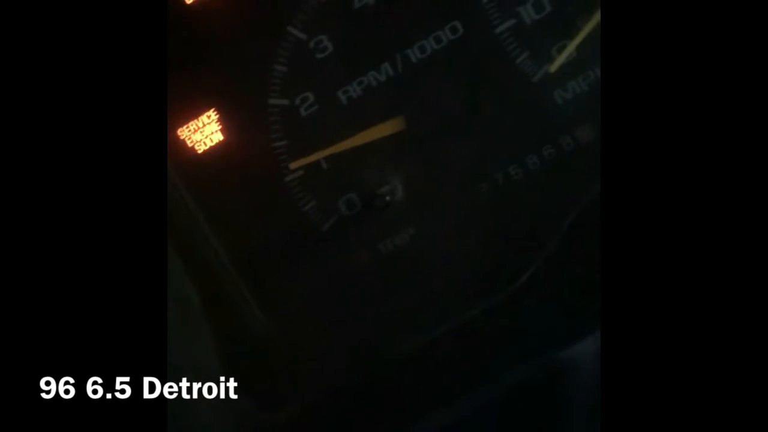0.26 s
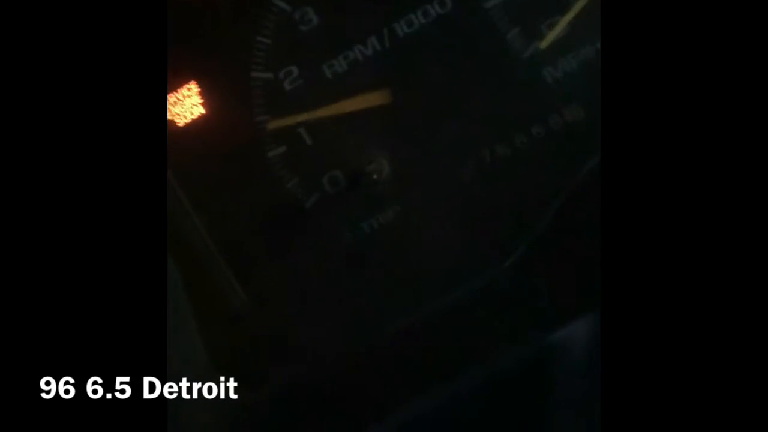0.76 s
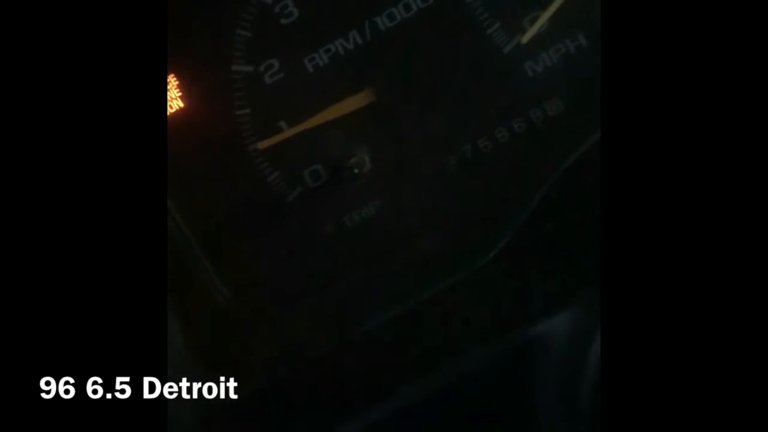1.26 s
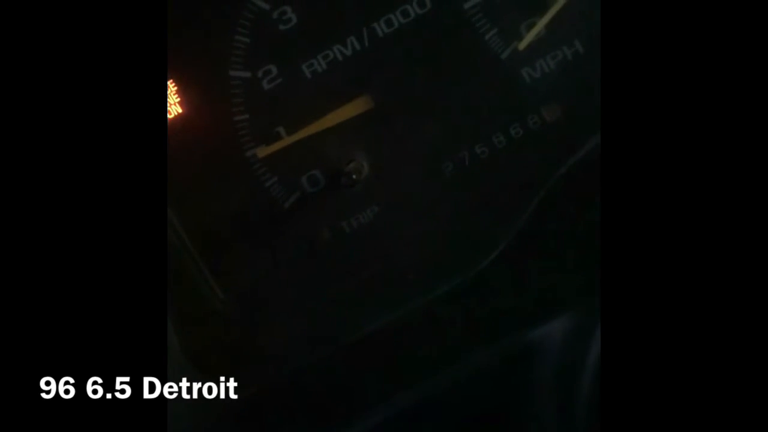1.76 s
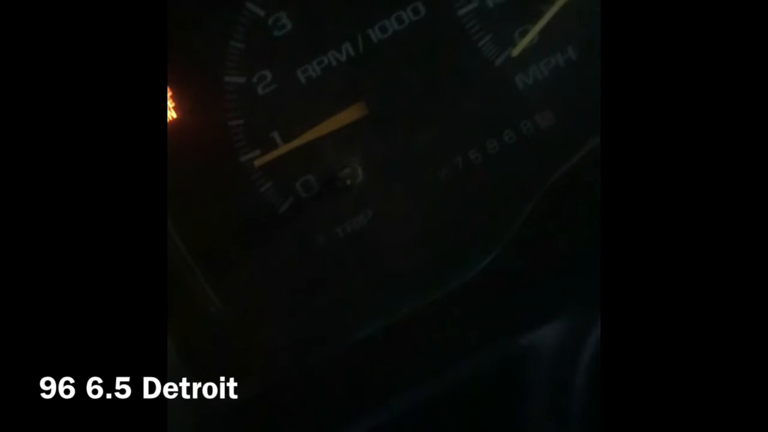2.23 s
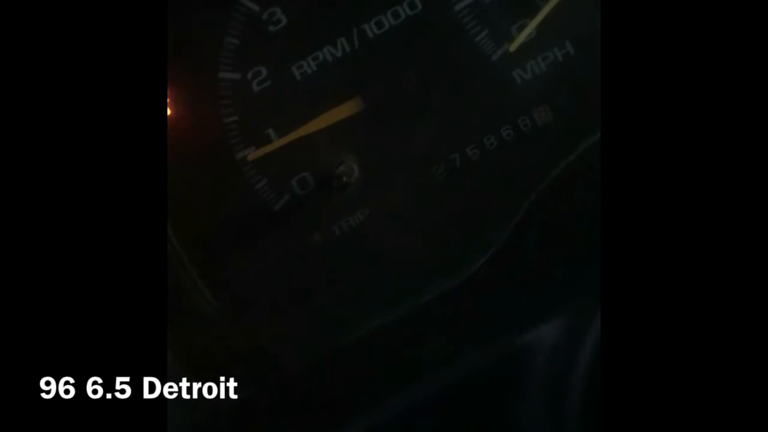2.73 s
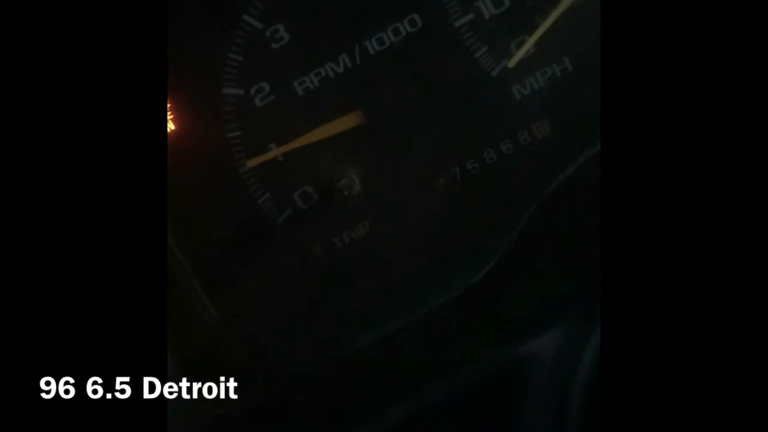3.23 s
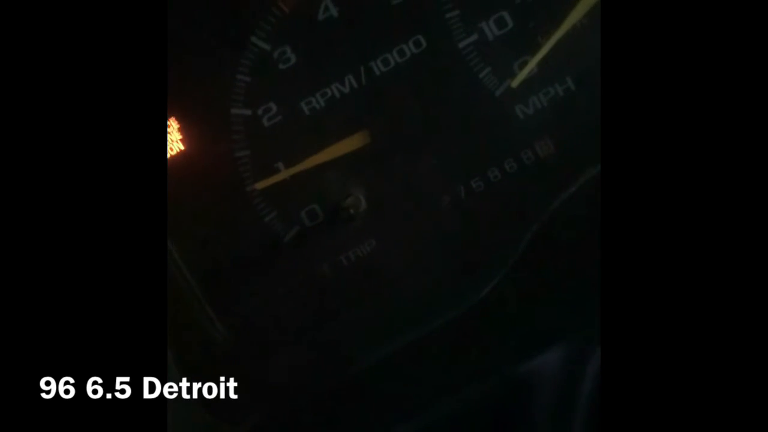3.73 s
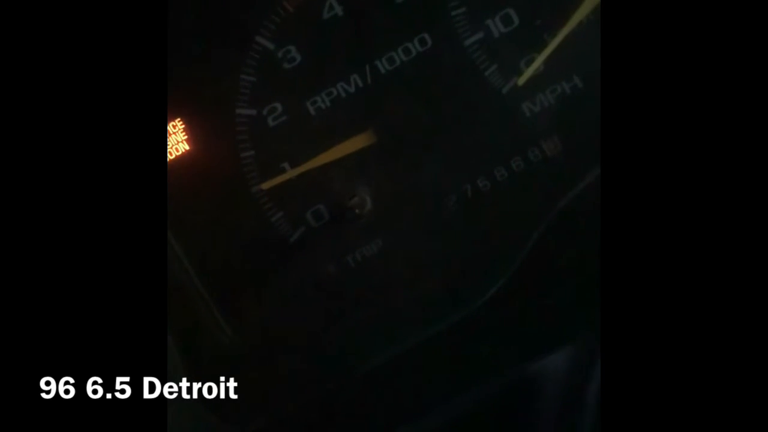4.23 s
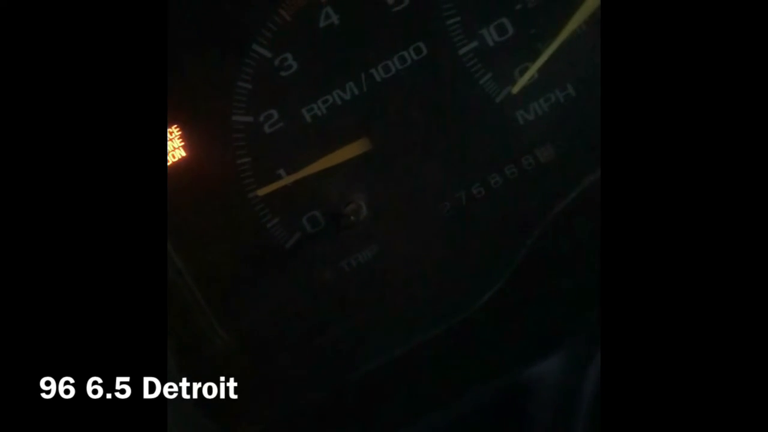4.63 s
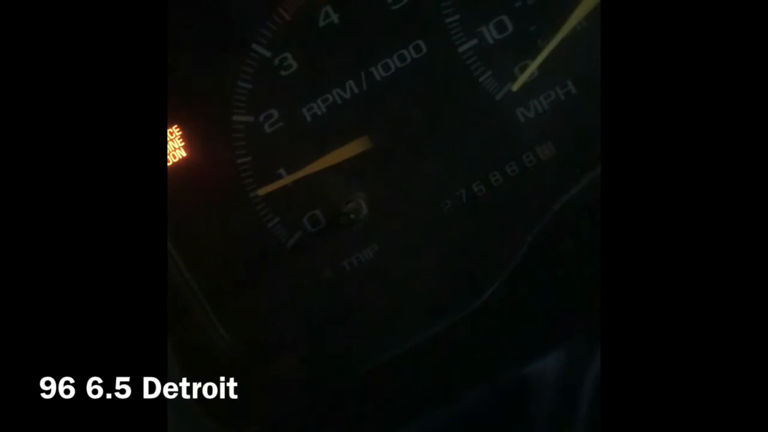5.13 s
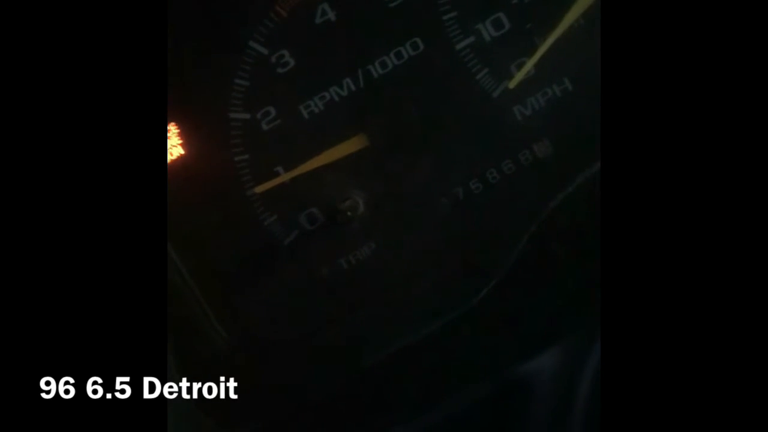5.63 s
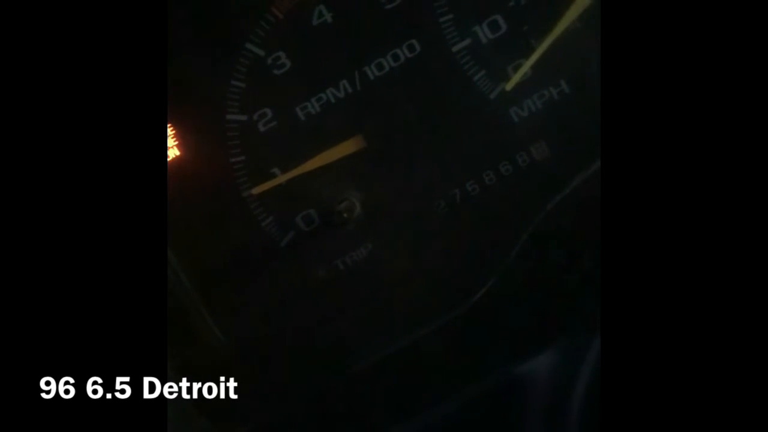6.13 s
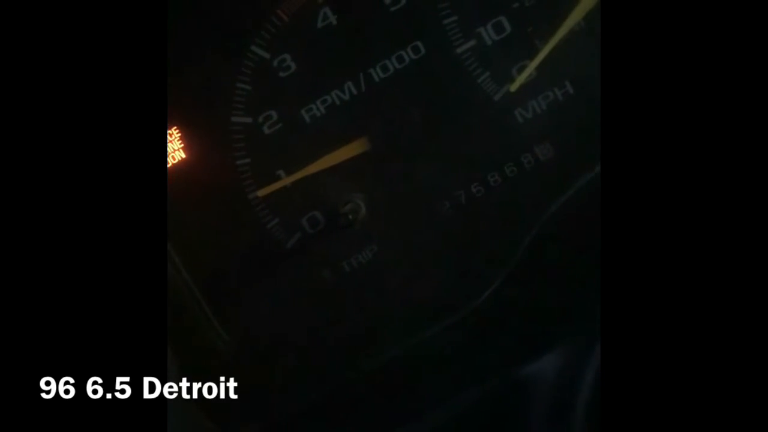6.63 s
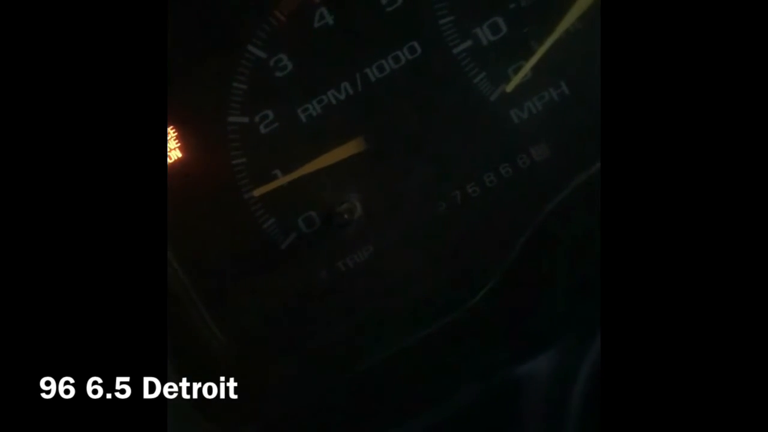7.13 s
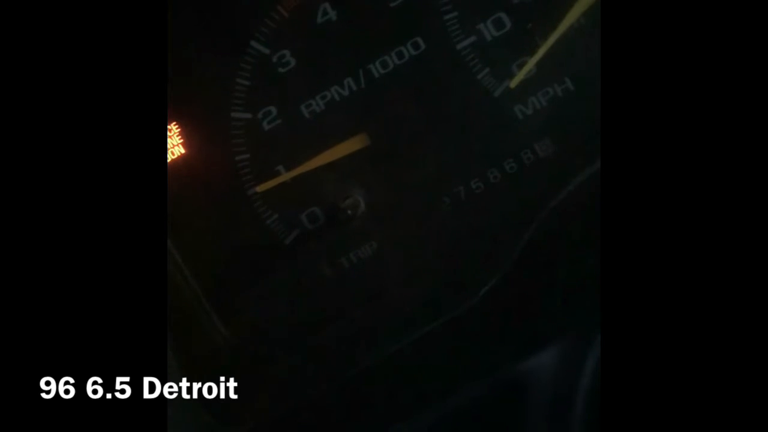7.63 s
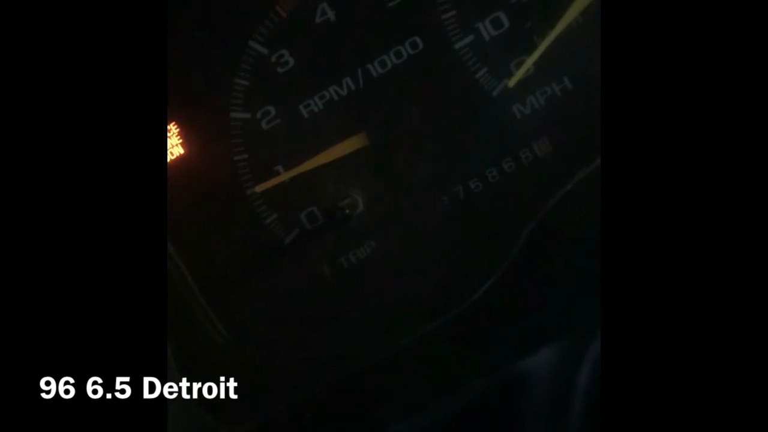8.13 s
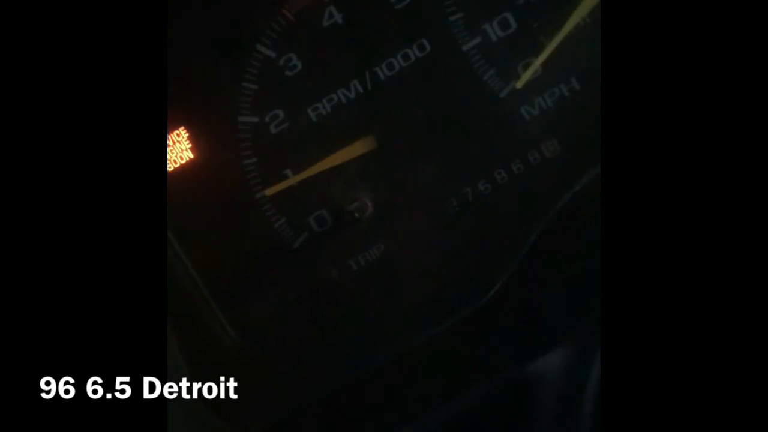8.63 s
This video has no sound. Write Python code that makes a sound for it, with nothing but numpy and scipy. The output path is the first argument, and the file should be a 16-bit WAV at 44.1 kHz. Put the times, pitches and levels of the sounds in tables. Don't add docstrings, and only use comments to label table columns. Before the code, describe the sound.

A big diesel shudders just after a cold start, with booming lurches and sharp metal slaps crowding the first second. The revs sag, climb quickly, drop back and hold as a lumpy, regular idle of low thumps, dry block knocks and light pump ticks. Heard from the enclosed cab on a small, slightly hissy microphone, dull on top and lacking deep bass.

```python
import sys
import numpy as np
from scipy import signal
from scipy.fft import rfft, irfft, next_fast_len
from scipy.io import wavfile
from scipy.ndimage import uniform_filter1d

SR = 44100
rng = np.random.default_rng(int(sys.argv[2]) if len(sys.argv) > 2 else 0)


def unload_audio(sound):
    columns = np.transpose(np.atleast_2d(sound))
    steps = np.round(np.clip(columns, -1, 1) * 32767)
    wavfile.write(sys.argv[1], SR, steps.astype(np.int16))


def gain_from_db(level_db):
    decades = np.asarray(level_db, float) / 20
    return 10 ** decades


N = 391166
SIZE = next_fast_len(N + SR)
HZ = np.arange(SIZE // 2 + 1) * SR / SIZE + 1e-3
TIME = np.arange(N) / SR

# from t/s, to t/s, level/dB
HISS_STEPS = [
    (0, 1.355, -67),
    (2.82, 4.555, -67),
    (8.862, 8.9, -71),
]
# f/Hz, level/dB per Hz
HISS_COLOUR = [(4000, -2), (8000, -2), (10000, -2), (10500, -5), (11000, -1), (15700, 1)]
QUIET_HISS_DB = -75.5

# from t/s, to t/s, f/Hz, width/Hz, level/dB
BELT_SLIP = (.088, .25, 5300, 700, -61)
# time/share of cycle, f/Hz, level/dB re sharp edge, scatter/dB, length/s
PUMP_RINGS = [
    (.745, 2360, -13, 2.2, .016),
    (.245, 2370, -17.5, 3.5, .016),
    (.1, 4450, -32, 4.5, .09),
]
TICK_SHARPNESS = 18

# t/s, peak level/dB, sizzle level/dB, air level/dB, body level/dB
SLAPS = [(0.098, -23, -34, -48, -9.5), (0.252, -11.5, -30, -28.5, 5.5), (0.276, -16.5, -27, -20.5, 7),
         (0.292, -16, -22.5, -25.5, 6.5), (0.308, -18, -20, -22.5, 8.5), (0.324, -14, -25, -21, 8.5),
         (0.575, -26.5, -19.5, -31.5, -1), (0.661, -9, -37, -46, -12), (0.7022, -14.5, -23, -48, -16),
         (0.915, -22, -33, -37, -24), (1.035, -19.5, -42, -39, -13.5), (1.093, -8.5, -30, -31, -21),
         (1.216, -39.5, -34, -41, 5)]
# f/Hz, width/Hz, level/dB
METAL_RING = [(3120, 600, 14), (2780, 130, 7.5), (3620, 350, 1)]
CLATTER_T60_S = 0.045
# centre t/s, f/Hz, peak level/dB, length/s
SHUDDERS = [(0.234, 57.7, -1, 0.045), (0.85, 62, -13, 0.16), (0.88, 182, -17, 0.096),
            (0.959, 170, -18.5, 0.15), (3.2, 93, -9, 0.07), (3.2, 225, -29, 0.58), (2.27, 130, -25.5, 0.6),
            (1.1, 110, -25, 0.97)]

# t/s, turns per minute
SPEED = [(0.0, 906.8), (0.9, 914.4), (1.14, 825.7), (1.4, 922.8), (1.75, 862.5), (1.95, 797.0),
         (2.4, 804.4), (2.7, 926.1), (2.95, 1007.2), (3.2, 1096.3), (3.4, 1028.5), (3.55, 936.5),
         (3.95, 963.8), (5.8, 959.6), (6.2, 955.3), (8.87, 951.8)]
START_CYCLE = 1.39
STEADY_CYCLE = 5533
HUNT_HZ, HUNT_WIDTH_HZ, HUNT_CYCLES, HUNT_DB = 2.8, 1.3, .006, .9
# t/s, level/dB re warm idle, depth of the cylinder pattern
FUEL = [(0, 3, 0.25), (.1, 5.5, 0.43), (.32, -1, 2.3), (.38, -3, .5), (.47, -2.5, 0.45), (.52, 6, 0.21),
        (.85, 4.5, 0.52), (.95, -7, 0.35), (1.08, -7.5, 1.2), (1.12, -2.5, 1), (1.2, -2.5, 2),
        (1.24, 2, 1.3), (1.5, -1.5, 1.5), (1.9, -3, 1.1), (2.9, 2.5, 1.4), (3.6, 0, 0.88), (4.2, 0.5, 1.3),
        (8.87, -0.5, 1.5)]
IDLE_DB = {"thump": -19.5, "growl": -32.5, "knock": -29.5, "edge": -42.5}
FUEL_SHARE = {"thump": 0.05, "growl": 0.68, "knock": 1.0, "edge": 1.3}
# t/s, level/dB over its usual knock
HARD_STROKES = [(.67, 4), (1.11, 12), (1.26, 5.5), (1.38, 4.5), (1.51, 1), (1.67, 5), (1.8, 5.5),
                (1.95, 3.5), (2.09, 3.5), (2.25, 3.5), (2.4, 3), (2.55, 5.5), (2.93, 2), (3.27, 3),
                (3.75, 5), (4.13, 4.5), (4.25, 1.5), (4.63, 1.5), (5.0, 5.5), (5.62, 1.5), (6.62, 0),
                (7.12, 4.5), (7.76, 0.5), (8.51, 1.5)]
HARD_SHARE = {"thump": 0.06, "growl": 0.6, "knock": 0.63, "edge": 1.39}
HARD_S = 0.025

# t/s, unevenness of the firing/0-1, scatter between firings/dB
COLD = [(0, .7, 3), (.7, .7, 3), (.8, .4, 2), (1, .7, 3), (1.5, .6, 2), (1.8, .12, 1.3), (2.4, .12, 1.3),
        (2.7, 1, 2), (3.7, 1, 1), (4, 1, .55), (8.87, 1, .5)]
# arrival/share of cycle, level/dB
THUMPS = [(.086, 2.8), (.14, .3), (.262, -4.3), (.383, -7.7), (.529, .1), (.782, 1.6), (.837, 4.9),
          (.906, 1.1)]
# f/Hz, width/Hz, level/dB, sign
CAB_MODES = [(71, 44, -23.2, 1), (82, 23, -21, -1), (124, 12, -34.9, -1), (149, 7, -37.8, -1),
             (176, 7, -43.3, -1), (202, 30, -44.9, -1)]
# f/Hz, level/dB per Hz
RUMBLE = [(25, -30.5), (40, -9.5), (55, -13), (100, -3), (140, 3.5), (200, -0.5), (250, -13.5), (400, -66)]
# t/s, thump level/dB over idle, half length/s
LURCHES = [(0, 3, 0.03), (0.2, 7.5, 0.073), (0.422, -3.5, 0.066), (0.504, 4.5, 0.056), (0.64, -6, 0.017),
           (0.679, 6.5, 0.011), (0.809, 13, 0.039), (0.88, 6, 0.045), (1.026, -2.5, .08), (2.892, 3, 0.087),
           (3.102, -2, 0.12)]

# time/share of cycle, growl level/dB, knock level/dB
CYLINDERS = [(.01, 0.5, 1.1), (.13, 0, -2.5), (.27, -2, -2), (.38, -1.1, 1.1), (.52, 2.2, 1.1), (.65, 4, 0),
             (.79, -1.5, 3.3), (.91, -0.5, -0.4)]
# f/Hz, level/dB per Hz
BLOCK = [(200, -2.5), (260, -16.5), (400, -17), (520, -24.5), (740, -19.5), (800, -15), (1300, -15),
         (1500, -20.5), (2050, -27.5), (3300, -31), (4000, -50.5), (5000, -56.5), (7000, -67),
         (9000, -93.5)]
# f/Hz, width/Hz, level/dB
BLOCK_MODES = [(327, 8.3, 2.5), (473, 22, 7), (564, 38, 5), (781.4, 8.3, 10), (888, 75, 1), (977, 18, 6),
               (1169, 25, 4.5), (1280, 12, 5.5), (1406, 12, 0), (1625, 29, 6), (1908, 22, 6),
               (2300, 90, 3.5), (3000, 67, 3.5), (3212, 20, 6)]
LOPE_DB = {"growl": .1, "knock": 1.3, "edge": .6}


def rms_one(x):
    return x / np.sqrt(np.mean(x ** 2) + 1e-20)


def evened(x, window_s):
    return x / np.sqrt(uniform_filter1d(x ** 2, int(window_s * SR)) + 1e-12)


def in_time(rows):
    s, *columns = np.transpose(rows)
    return [np.interp(TIME, s, c) for c in columns]


def swell(s, half_s):
    return np.exp(-((TIME[::32] - s) / half_s) ** 2)


def fine(coarse):
    return np.interp(TIME, TIME[::32], coarse)


def through(x, response):
    return irfft(rfft(x, SIZE) * response, SIZE)[:N]


def noise_through(response):
    return rms_one(through(rng.standard_normal(N), response))


def resonance(hz, width_hz):
    return 1j * HZ * width_hz / (hz ** 2 - HZ ** 2 + 1j * HZ * width_hz)


def colour(points):
    hz, level_db = np.transpose(points)
    return gain_from_db(np.interp(np.log(HZ), np.log(hz), level_db))


def above(hz, order=4):
    return 1 / (1 + (hz / HZ) ** order)


def firings(cycles, shares):
    angle = np.arange(-1, 73)[:, None] + shares
    return np.interp(angle, cycles, np.arange(N), left=N, right=N).astype(int)


def strikes(at, gains):
    out = np.zeros(N + 1)
    np.add.at(out, at.ravel(), gains.ravel())
    return out[:N]


def hunting():
    edges_hz = [HUNT_HZ - HUNT_WIDTH_HZ / 2, HUNT_HZ + HUNT_WIDTH_HZ / 2]
    band = signal.butter(2, edges_hz, "band", fs=SR / 32, output="sos")
    length = len(TIME[::32])
    wander = signal.sosfilt(band, rng.standard_normal(2 * length))
    return fine(rms_one(wander[length:]))


def crank():
    turning = np.cumsum(in_time(SPEED)[0]) / (120 * SR)
    return START_CYCLE + turning + HUNT_CYCLES * hunting()


def effort_db(layer):
    hard_db = fine(sum(db * swell(s, HARD_S) for s, db in HARD_STROKES))
    return IDLE_DB[layer] + FUEL_SHARE[layer] * in_time(FUEL)[0] + HARD_SHARE[layer] * hard_db


def microphone_hiss():
    gain = gain_from_db(QUIET_HISS_DB)
    for start, end, db in HISS_STEPS:
        gain = gain + gain_from_db(db) * (TIME >= start) * (TIME < end)
    return gain * noise_through(colour(HISS_COLOUR) * above(3700))


def belt_squeal():
    start, end, hz, width, db = BELT_SLIP
    fade = np.interp(TIME, [start - .005, start, end], [0, 1, 0])
    return gain_from_db(db) * np.sqrt(fade) * noise_through(resonance(hz, width) ** 2)


def injectors(cycles):
    out = 0
    for share, hz, db, scatter_db, length in PUMP_RINGS:
        at = firings(cycles, np.array([share]))
        clicks = strikes(at, gain_from_db(scatter_db * np.clip(rng.standard_normal(at.shape), -3, 1.6)))
        carrier = rng.standard_normal(N)
        swish = hz > 3000
        if not swish:
            carrier = np.sin(2 * np.pi * hz * TIME) + .5 * carrier
        puffs = signal.fftconvolve(clicks, np.hanning(int(length * SR)), "same") * carrier
        width = hz / TICK_SHARPNESS * (1 + 2 * swish)
        out = out + gain_from_db(db) * rms_one(through(puffs, resonance(hz, width) ** 2))
    return gain_from_db(uniform_filter1d(effort_db("edge"), size=SR // 5)) * out


def clatter():
    ring = sum(gain_from_db(db) * resonance(hz, width) ** 2 for hz, width, db in METAL_RING)
    sizzle = above(4000, order=8) * (1 - above(5400))
    air = above(6500)
    body = resonance(600, 300) + gain_from_db(-5.5) * resonance(1600, 450)
    noises = [noise_through(band) for band in (ring, sizzle, air, body)]
    decay_rates = 0.67, 1.0, 3.3, .8
    age = np.arange(SR // 4) / SR
    rise = 1 - np.exp(-age / 0.0041)
    out = np.zeros(N)
    for s, peak_db, sizzle_db, air_db, body_db in SLAPS:
        i = int(s * SR)
        span = slice(i, i + len(age))
        levels_db = -6.5, sizzle_db - 1.5, air_db - 7.5, body_db - 12
        for noise, db, rate in zip(noises, levels_db, decay_rates):
            fall_db = 60 * rate * age / CLATTER_T60_S
            out[span] += gain_from_db(peak_db + db - fall_db) * rise * noise[span]
    return out


def shudder():
    out = 0
    for s, hz, db, length in SHUDDERS:
        envelope = np.exp(-(3.2 * (TIME - s) / length) ** 2)
        out = out + gain_from_db(db) * envelope * np.sin(2 * np.pi * hz * TIME)
    return out


def knock(cycles):
    depth = in_time(FUEL)[1]
    share, growl_db, knock_db = np.transpose(CYLINDERS)
    at = firings(cycles, share)
    deep = depth[np.minimum(at, N - 1)]
    repeated = rng.standard_normal(SR // 8)[(cycles % 1 * (SR // 8)).astype(int)]
    modes = 1 + sum((gain_from_db(db) - 1) * resonance(hz, width) for hz, width, db in BLOCK_MODES)
    block = above(200, order=8) * colour(BLOCK) * modes
    low, high = above(620, order=6), above(1550, order=6)
    # layer, cylinder pattern/dB, decay/s, repeating share, steady bed, band, trim/dB
    layers = [("growl", growl_db, .006, .75, .35, 1 - low, .5),
              ("knock", knock_db, .012, .7, .55, low * (1 - high), -7),
              ("edge", knock_db, .014, .35, .65, high, .5)]
    lope = depth * np.cos(2 * np.pi * (cycles - .68))
    out = 0
    for layer, pattern_db, decay_s, repeat, bed, band, trim_db in layers:
        fall = np.exp(-1 / (decay_s * SR))
        hits = strikes(at, gain_from_db(deep * pattern_db + rng.standard_normal(at.shape)))
        burst = signal.lfilter([1], [1, -fall], hits)
        burst = uniform_filter1d(burst, size=SR // 140, origin=SR // 400)
        rattle = repeat * repeated + np.sqrt(1 - repeat ** 2) * rng.standard_normal(N)
        driven = gain_from_db(LOPE_DB[layer] * lope) * (burst + bed) * rattle
        out = out + gain_from_db(effort_db(layer) + trim_db) * evened(through(driven, block * band), 0.57)
    return out


def thump(cycles):
    uneven, scatter_db = in_time(COLD)
    share, pattern_db = np.transpose(THUMPS)
    even = np.arange(8) / 8 + .03
    start = np.minimum(firings(cycles, even), N - 1)
    start[:3] = 0
    chance = rng.standard_normal(start.shape + (2,)) * scatter_db[start][..., None]
    arrival = even + uneven[start] * (share - even) + chance[..., 1] / 500
    at = firings(np.arange(N) / STEADY_CYCLE, arrival)
    pulses = strikes(at, gain_from_db(uneven[start] * pattern_db + chance[..., 0]))
    cab = sum(sign * gain_from_db(db) * resonance(hz, width) for hz, width, db, sign in CAB_MODES)
    bent = np.interp(cycles * STEADY_CYCLE, np.arange(N), through(pulses, cab))
    boom = rms_one(through(bent, above(45) * (1 - above(330))))
    boom = boom + gain_from_db(2 * scatter_db - 15) * noise_through(colour(RUMBLE))
    boom = boom + gain_from_db(-21) * np.sin(2 * np.pi * 24 * cycles)
    lurch_db = fine(sum(db * swell(s, half_s) for s, db, half_s in LURCHES))
    return gain_from_db(effort_db("thump") + lurch_db) * evened(boom, 1.0)


def scene():
    cycles = crank()
    boom = gain_from_db(HUNT_DB * hunting()) * thump(cycles)
    mix = belt_squeal() + injectors(cycles) + clatter() + shudder() + knock(cycles) + boom
    return mix[None]


def low_pass(x):
    return signal.sosfilt(signal.butter(12, 15720, fs=SR, output="sos"), x)


def record(dry):
    heard = through(dry[0], above(38, order=10)) + microphone_hiss()
    rounded = 1.4 * np.tanh(heard[None] / 1.4)
    return low_pass(rounded)


dry = scene()
out = record(dry)
unload_audio(out)
```